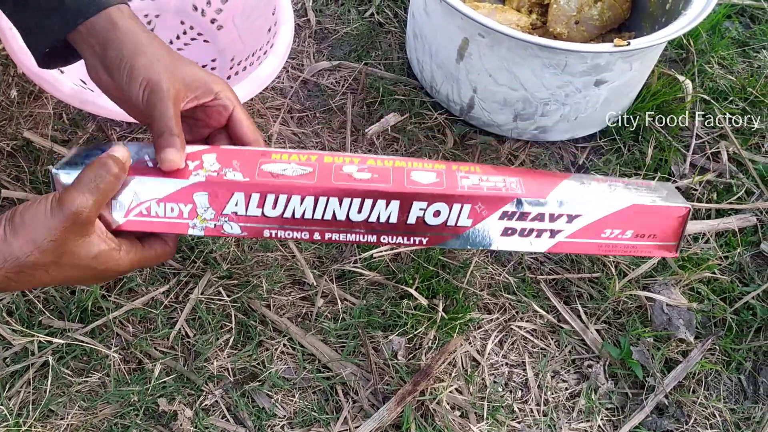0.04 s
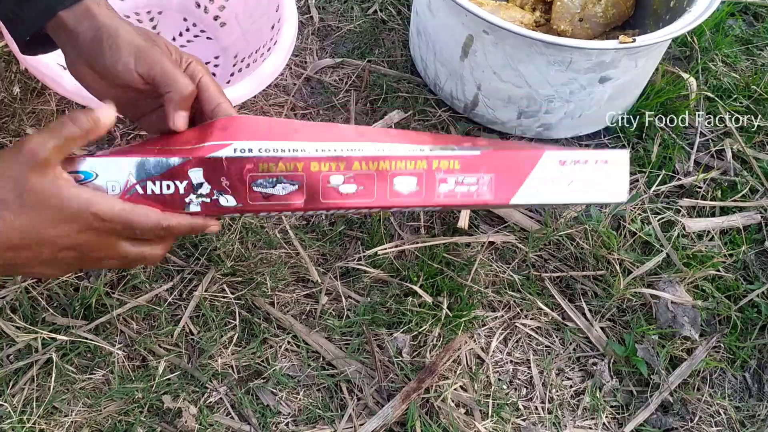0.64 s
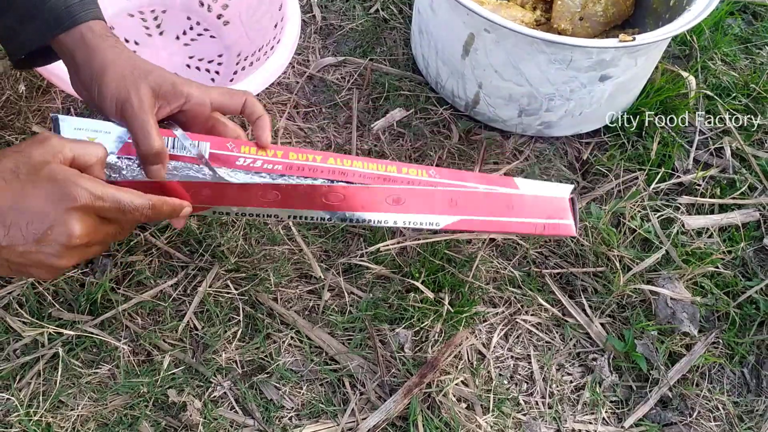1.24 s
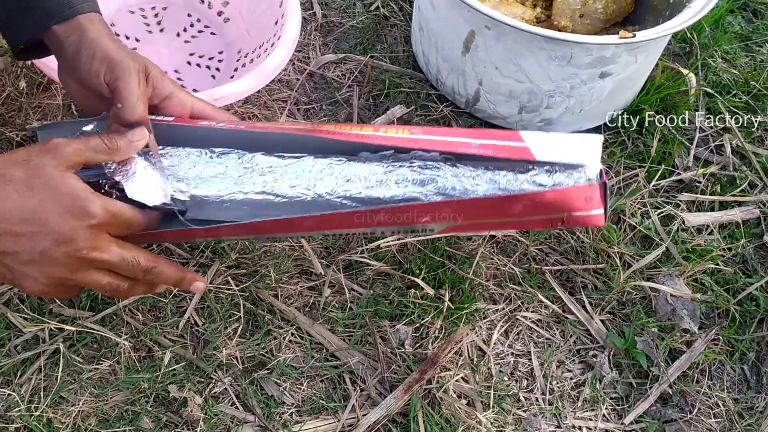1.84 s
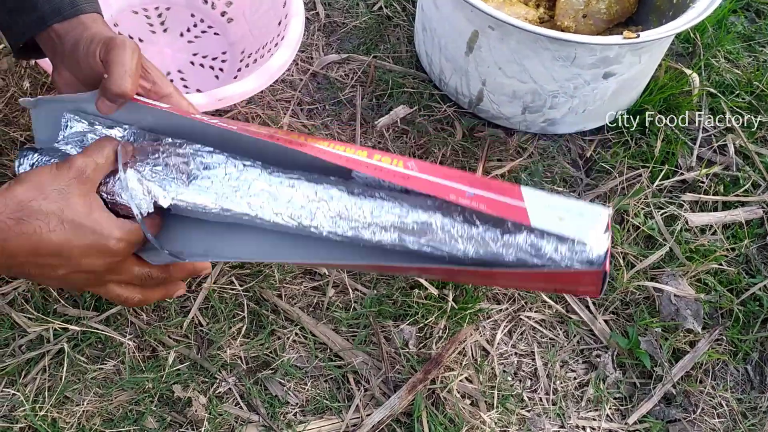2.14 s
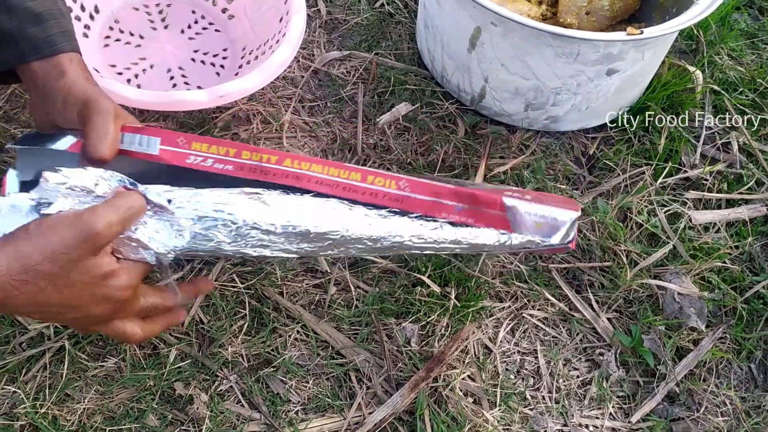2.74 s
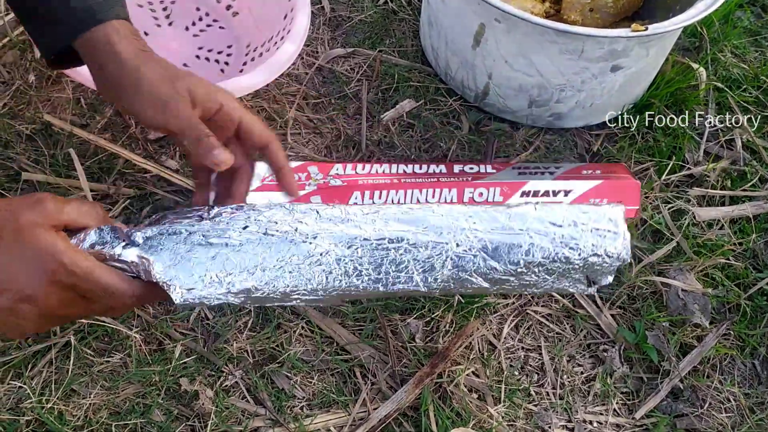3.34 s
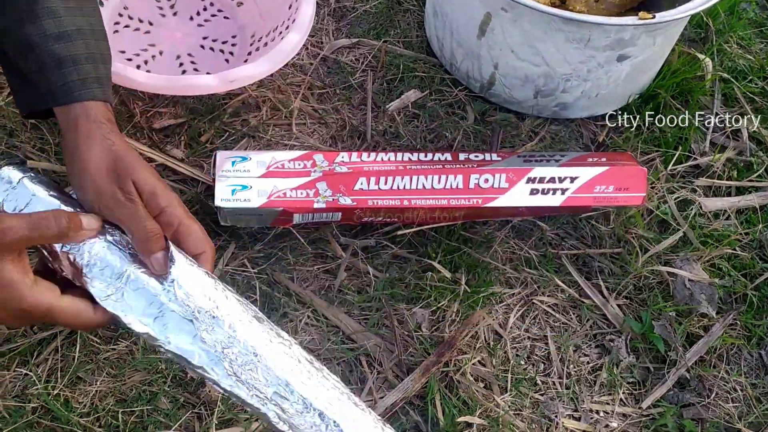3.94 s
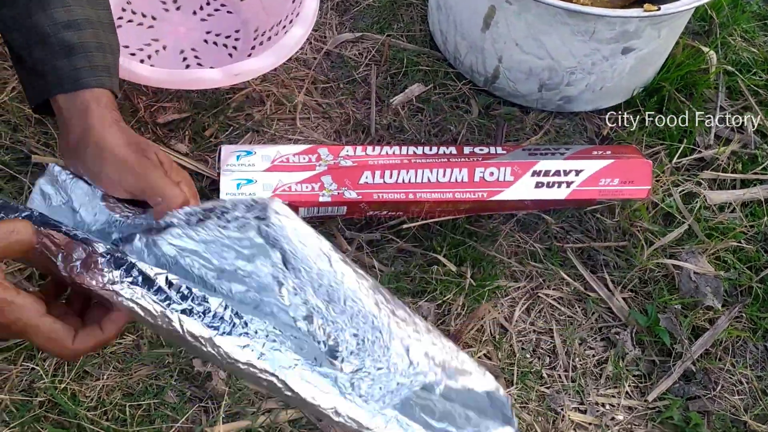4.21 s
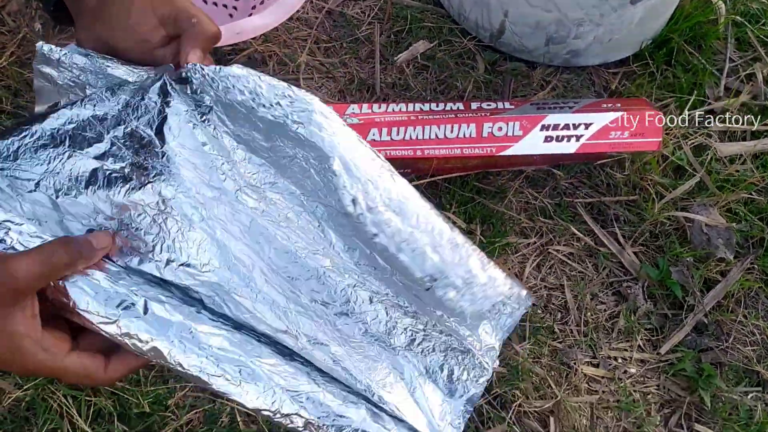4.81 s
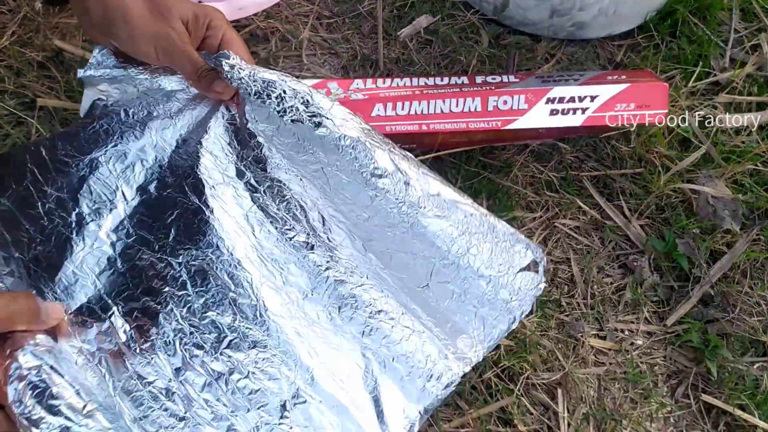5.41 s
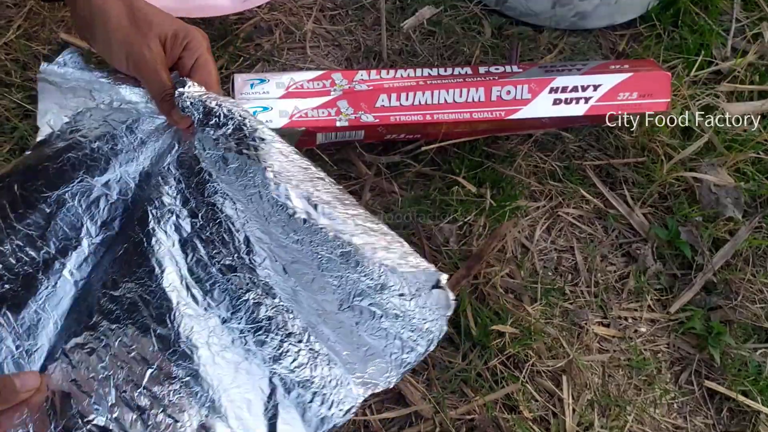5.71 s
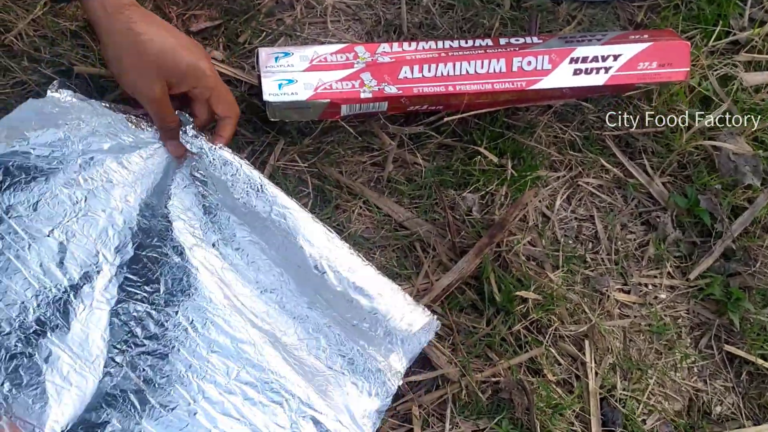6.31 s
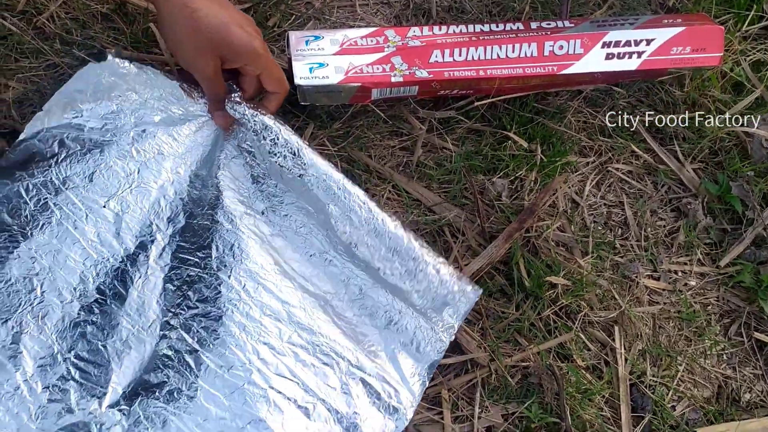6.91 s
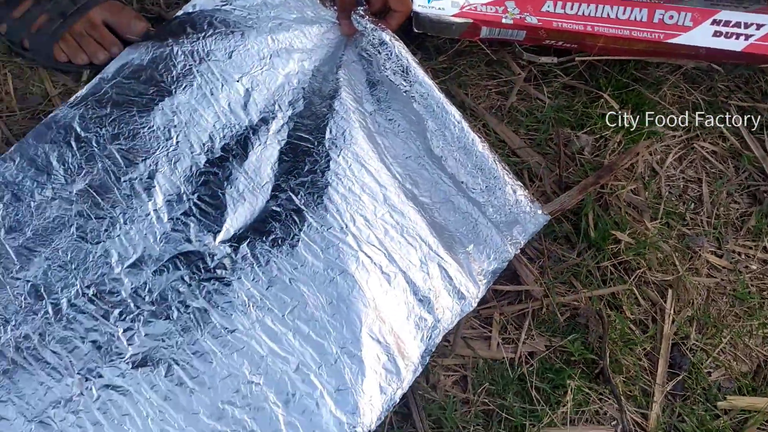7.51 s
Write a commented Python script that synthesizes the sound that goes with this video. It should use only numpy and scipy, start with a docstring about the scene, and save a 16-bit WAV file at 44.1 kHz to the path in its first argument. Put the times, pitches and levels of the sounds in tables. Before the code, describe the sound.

A cardboard box is handled near the microphone, tapping, rubbing and snapping as it opens. Foil crinkles inside, and the roll scrapes out with a short stutter. For the longer second part, a sheet of heavy aluminium foil is tugged open in uneven surges of metallic crackling and rustling. Behind it all lie a soft outdoor rumble and the steady low hum of a faraway engine.

```python
"""A cardboard box knocks and rubs as hands turn and open it; a roll of heavy aluminium foil is dragged
out, juddering on the wall, and the sheet is spread. The foil crackles as countless small creases buckle,
with a hollow rattle once its wide panels are free to flex. The box rings in its wall and cavity modes.
Outdoors, heard close by through two microphone ports; far off an engine hums."""
import sys
import numpy as np
from scipy import signal
from scipy.fft import rfft, irfft
from scipy.io import wavfile

SR = 44100
rng = np.random.default_rng(int(sys.argv[2]) if len(sys.argv) > 2 else 0)


def output_pcm(signal):
    """Save a mono or channel-first signal as 16-bit PCM at the path in sys.argv[1].

    Samples are clipped to [-1, 1] before scaling.
    """
    pcm = np.clip(np.atleast_2d(signal).T, -1, 1) * 32767
    wavfile.write(sys.argv[1], SR, np.round(pcm).astype(np.int16))


N = 332955
TIME = np.arange(N) / SR
FOIL_FREE_S = 3.0  # box let go, sheet free to flex
PORT_LAG_MS = 0.201  # left behind right

# opening of the sheet: t/s, share open (clipped to 0-1)
SHEET_OPENING = [(0, 0), (3.4, 0.08), (4.1, 0.06), (4.9, 0.04), (5.6, 0.45), (6.1, 1.03), (6.75, 1.1),
                 (7.2, 1), (7.55, 1.15)]
# spectrum of rolled foil: f/Hz, level/dB
ROLL_SPECTRUM = [(100, -21.5), (220, -14.5), (450, -12.5), (700, -8), (870, -13), (1080, -7), (1280, -14.5),
                 (1500, -6.5), (1900, -10.5), (2700, -8), (3200, -11), (4200, -6), (6000, -5.5), (8000, -4),
                 (11000, -7), (13500, -9), (16000, -13.5)]
# spectrum of the open sheet: f/Hz, level/dB
SHEET_SPECTRUM = [(100, -27), (250, -22), (720, -7), (900, -9), (1150, -5), (1350, -4), (1680, -5),
                  (1950, -6), (2600, -3.5), (3400, -1.5), (4300, -4), (5100, -6), (7500, -2.4),
                  (10500, -6.5), (13500, -8.5), (16000, -13)]
# treble shelf of the foil: t/s, gain/dB
FOIL_TREBLE = [(0, -11.5), (.8, -9.5), (1.05, 7), (1.3, -4), (2.2, -2), (2.45, -7.5), (2.6, -22),
               (2.75, -6), (3.5, 3), (4.5, 1), (5.4, 3), (6.1, 0.5), (6.75, 2.5), (7.15, 9), (7.45, 6.5)]


def foil(effort):
    """Buckling creases crackle in clumps over a fine fizz; the spectrum shifts as the sheet opens."""
    opened = np.clip(curve(SHEET_OPENING), 0, 1)
    density = 1 + 2 * opened
    crackle = unit(creases(per_s=500 * density) / np.sqrt(density))
    fizz = unit(ports(*rng.standard_normal((2, N)), PORT_LAG_MS))
    texture = amp(-4.5) * crackle + amp(-7) * tinkles() + amp(-3.5) * fizz
    worked = texture * effort * amp(1.1 * wander(8, 90))
    sheet = amp(-3) * colour(worked * (1 - opened), ROLL_SPECTRUM)
    sheet += amp(-0.5) * colour(worked * opened, SHEET_SPECTRUM)
    treble = signal.sosfiltfilt(signal.butter(1, 6000, "highpass", fs=SR, output="sos"), sheet)
    sheet += (amp(curve(FOIL_TREBLE)) - 1) * treble
    return sheet_echo(sheet) * lean_left(0.9)


# steady handling of the foil: t/s, level/dB
FOIL_GRIP = [(0, -38), (.42, -33.5), (.48, -43), (.75, -32.5), (1.05, -32.5), (1.45, -30.5), (1.86, -29.5),
             (2.15, -24), (2.58, -34), (2.76, -23.5), (3.15, -31), (3.25, -38), (3.38, -26.5),
             (3.88, -35.5), (4.0, -22.5), (4.5, -21.5), (5.9, -23.5), (6.85, -30.5)]
# tugs at the foil: t/s, rise/s, hold/s, level/dB
FOIL_TUGS = [(0.029, 0.0036, 0.0066, -29), (0.912, .006, 0.025, -24), (0.981, 0.056, 0.054, -24.5),
             (1.241, 0.0077, 0.017, -15.5), (1.48, 0.0066, 0.004, -10), (1.52, .003, .016, -25.5),
             (1.622, 0.024, 0.05, -14.5), (1.716, 0.018, 0.067, -21), (2.162, .01, 0.018, -16),
             (2.201, 0.015, 0.12, -12.5), (2.3, 0.073, 0.13, -8.5), (2.623, 0.011, 0.021, -23.5),
             (2.694, 0.011, 0.025, -21.5), (3.007, 0.016, 0.066, -21), (3.493, 0.064, 0.038, -19.5),
             (3.612, 0.054, 0.05, -23), (3.731, 0.022, 0.028, -21.5), (3.848, 0.0061, 0.0051, -19.5),
             (3.913, 0.059, 0.054, -19.5), (4.016, 0.034, 0.02, -14.5), (4.082, 0.068, 0.047, -15),
             (4.255, 0.021, 0.061, -19.5), (4.314, 0.055, 0.046, -19), (4.493, 0.061, 0.05, -21),
             (4.727, 0.02, 0.011, -40), (4.81, 0.017, 0.046, -33), (4.882, 0.026, .05, -23),
             (5.001, 0.015, 0.027, -21.5), (5.144, 0.1, 0.014, -18.5), (5.358, 0.03, 0.032, -19.5),
             (5.486, 0.024, 0.056, -22.5), (5.64, 0.014, 0.055, -21.5), (5.834, 0.09, 0.036, -18.5),
             (6.005, 0.029, 0.13, -23), (6.158, 0.041, 0.016, -22), (6.349, 0.016, 0.018, -24),
             (6.383, 0.078, 0.14, -20), (6.625, 0.044, 0.042, -22), (6.715, 0.038, 0.011, -21.5),
             (6.873, 0.031, 0.017, -19), (7.076, 0.038, 0.23, -25), (7.361, 0.074, 0.022, -13.5)]
# brief rests of the hands: t/s, gain/dB
HAND_RESTS = [(1.226, -1), (2.558, -9), (2.891, -2), (2.99, -3.5), (4.24, -2.5), (4.675, -4), (5.14, -3.5),
              (5.77, -1.5), (6.85, -0.5)]


def hand_effort(release_db_per_s=356, rest_s=0.024):
    """Tugs add their power to the steady handling; both ease when the hands rest."""
    tug_power = sum((amp(db) * stroke(s, rise, hold, release_db_per_s)) ** 2
                    for s, rise, hold, db in FOIL_TUGS)
    rest_db = sum(db * np.exp(-((TIME - s) / rest_s) ** 2) for s, db in HAND_RESTS)
    return np.sqrt(amp(curve(FOIL_GRIP)) ** 2 + tug_power) * amp(rest_db)


def creases(per_s, facets=28):
    """Creases buckle in facets of the sheet; each has its own pitch and place, and they take turns."""
    out = np.zeros((2, N))
    for hz in np.geomspace(2900, 13000, facets):
        lag_ms = rng.uniform(0.04, 0.392)
        tick = burst(0.002, 0.00003, lag_ms) + burst(0.03, 0.008, lag_ms)  # onset + tail
        tick = unit(tick + amp(10) * ring(tick, hz, hz / 7))
        train = clicks(per_s / facets, spread_db=4.2) * amp(3.5 * np.tanh(wander(6.9, 40)))
        out += convolve(train[None], tick)
    return unit(out)


def tinkles(per_s=560, facets=64, t60_cycles=45):
    """Small stiff facets ring on after their crease gives, each on its own metallic note."""
    out = np.zeros((2, N))
    for hz in np.linspace(2600, 13000, facets):
        t = port_time(2048, rng.uniform(0, 1.935) * PORT_LAG_MS)
        note = unit(amp(-60 * t * hz / t60_cycles) * np.sin(2 * np.pi * hz * t))
        train = clicks(per_s / facets, spread_db=2.8)
        for at in np.flatnonzero(train):
            add(out, at / SR, train[at] * note)
    return unit(out)


def sheet_echo(x, gain=0.28, delay_ms=0.452, sway=0.29):
    """An echo off the moving sheet: its changing delay sweeps a metallic comb through the sound."""
    at = np.arange(N)
    delay_samples = delay_ms * SR / 1000 * np.exp(sway * wander(1, 7.4))
    echo = np.array([np.interp(at - delay_samples, at, side) for side in x])
    return (x + gain * echo) / np.sqrt(1 + gain ** 2)


# snaps of the box lid and of large foil creases: t/s, level/dB, shake re tick/dB, f/Hz
SHARP_SNAPS = [(.891, -1, -22, 4600), (.906, .5, -22, 4800), (1.168, -13, 8, 7600), (1.239, -4.5, 3, 6000),
               (1.270, -.5, -7, 5000), (1.413, -16, 2, 6000), (1.541, -6, -2, 5030),
               (1.570, -1.5, -10, 6000), (1.604, -2.5, -2, 4300), (1.644, 5, -4, 7700),
               (1.659, -0.5, 1, 8000), (1.897, -13, 4, 6000), (1.957, -6, 0, 5500), (1.991, -12, 9, 6500),
               (2.060, -9, 3, 5000), (2.1, -1.5, -4, 6000), (2.173, -9.5, 8, 6000), (2.186, 0, -2, 4800),
               (2.217, -4, 1, 5500), (2.238, -2, 1, 6900), (2.286, 2, 2, 7600), (2.359, 0, -2, 4800),
               (2.369, -3, -2, 4100), (2.395, 4.5, -4, 4000), (2.413, -2, 0, 4100), (2.472, 1, -1, 3100),
               (2.603, -12, -1, 3600), (2.714, -13, 4, 6900), (2.823, -16, 4, 6900), (2.908, -16, 4, 6200),
               (3.144, -12, -1, 8300), (3.206, -12, -6, 7000), (3.29, -14, -2, 7000), (3.316, -16, 2, 5500),
               (3.356, -14, 1, 7600), (3.38, -10, 0, 6900), (3.56, -5, 2, 6900), (3.607, -1, -5, 7600),
               (3.692, -8, 3, 7600), (3.801, -4, 2, 6900), (3.830, -0.5, -6, 8500), (3.855, -11, 1, 6200),
               (3.876, -7, 1, 4800), (4.052, 0, 2, 6000), (4.117, -2, -3, 5500), (4.15, -1, 4, 6900),
               (4.18, 3, -8, 8500), (4.195, 1, -6, 6000), (4.285, -4, 3, 6900), (4.319, 0, -9, 8000),
               (4.373, -1, 0, 4800), (4.387, 2, -1, 6900), (4.42, -3, 2, 8300), (4.592, -3, 2, 8300),
               (4.624, -3, 0, 9000), (4.695, -10, 1, 6200), (4.751, 0, -9, 6200), (4.765, -4, -1, 6200),
               (4.828, -8, 0, 4800), (4.959, -5, -1, 7600), (5.104, -2, -2, 7600), (5.252, -2, 4, 6900),
               (5.409, -4, 2, 7600), (5.640, 3, -2, 6000), (5.867, -7, 3, 8700), (6.067, 1, -2, 6500),
               (6.106, -1, -2, 3900), (6.141, 4.5, -3, 6000), (6.312, -4, -4, 6200),
               (6.330, 4.5, -11, 11500), (7.400, 3, -4, 7000)]


def snaps():
    """The box lid or a large foil crease snaps: one sharp, pitched tick and a short shake."""
    out = np.zeros((2, N))
    for s, db, shake_db, hz in SHARP_SNAPS:
        tick = burst(0.009, 0.00003, 0.224)
        tick = 0.42 * tick + 1.4 * ring(tick, hz, hz / 4.5)
        shake = amp(shake_db) * burst(0.03, 0.0028, 0.2)
        add(out, s, amp(db + 8.5) * (tick + shake))
    return colour(out, ROLL_SPECTRUM) * lean_left(0.8)


# folds crushed in one go, and at 2.503 s a rasp of the roll catching on the wall: t/s, hold/s, level/dB, f/Hz
FOLD_CRUNCHES = [(1.617, .004, -26, 4320), (2.63, 0.031, -35, 4760), (2.631, .012, -30, 3030),
                 (2.503, .005, -12, 3030), (5.91, 0.03, -30, 3580), (6.063, .004, -23, 3400),
                 (6.496, 0.019, -24, 3060), (6.716, 0.023, -24, 3580), (6.748, 0.0088, -18.5, 3470),
                 (6.89, 0.018, -23.5, 3240), (7.412, 0.024, -19.5, 3170)]


def crunches(rise_s=0.0019, release_db_per_s=600, q=2.2):
    """A fold gives way, or the roll rasps on the wall: a dense run of small clicks rings a narrow band beside
    it."""
    drive = ports(clicks(4000, 1.7), clicks(4000, 4.2), lag_ms=0.19)
    out = np.zeros((2, N))
    for s, hold, db, hz in FOLD_CRUNCHES:
        note = unit(steep_ring(drive, hz, hz / q))
        out += amp(db) * stroke(s, rise_s, hold, release_db_per_s) * note
    return out * lean_left(0.9)


# spectrum of wide foil panels: f/Hz, level/dB
PANEL_SPECTRUM = [(90, 6.5), (170, -1.5), (300, -4.5), (500, -0.5), (690, 7), (870, -1.5), (1080, 8.5),
                  (1280, 5.5), (1650, -1.5), (2100, 5), (2750, 2), (6000, -22)]
# panels bending: t/s, hold/s, level/dB
PANEL_BENDS = [(2.623, 0.041, -33), (3.668, 0.03, -31.5), (3.779, 0.018, -32), (3.871, 0.0057, -31),
               (4.031, 0.013, -27.5), (4.102, 0.082, -27.5), (4.383, 0.03, -25.5), (5.016, 0.018, -28.5),
               (5.259, 0.014, -32), (5.411, 0.0088, -27), (5.631, 0.0078, -26.5), (5.774, 0.0094, -31),
               (5.84, 0.035, -34), (6.05, 0.096, -32.5), (6.48, 0.16, -37), (6.76, .015, -34),
               (6.889, 0.043, -32.5)]


def flexing(effort, panels=6, rise_s=0.0037, release_db_per_s=456):
    """Wide foil panels rattle hollowly at each bend and, once free of the box, with every move."""
    rattle = sum(convolve(clicks(120, 5.6)[None], burst(0.024, 0.00007, 0.25)) for _ in range(panels))
    bends = sum(amp(db) * stroke(s, rise_s, hold, release_db_per_s) for s, hold, db in PANEL_BENDS)
    flex = amp(-26) * effort * (TIME > FOIL_FREE_S)
    return amp(2) * np.hypot(bends, flex) * unit(colour(rattle, PANEL_SPECTRUM))


# pops and knocks of card or foil, ring of a hollow rub: t/s, level/dB, f/Hz, t60/s
HOLLOW_TONES = [(.056, -13.5, 200, 0.081), (1.3345, 7.5, 370, 0.01), (1.495, -2, 636, 0.022),
                (1.898, -5.5, 340, 0.049), (2.633, -19.5, 598, 0.23), (2.66, -20, 373, 0.13),
                (5.09, -36, 695, 0.018), (6.603, -11.5, 716, 0.037)]


def hollow_tones(rise_s=0.00049):
    """Card or foil pops, knocks or rings from a hollow rub, each in one short, decaying tone."""
    out, t = np.zeros((2, N)), np.arange(4096) / SR
    for s, db, hz, t60 in HOLLOW_TONES:
        tone = amp(db - 8.5 - 60 * t / t60) * (1 - np.exp(-t / rise_s)) * np.sin(2 * np.pi * hz * t)
        add(out, s, np.array([tone, tone]))
    return out


# box knocks, creaks, flap snaps: t/s, crack/dB, clack/dB, thud/dB, rattle t60/s, strike f/Hz
BOX_KNOCKS = [(0.018, -28, -24, -33, 0.088, 1000), (0.055, -15.5, -15, -19, 0.055, 900),
              (.062, -31, -18.5, -34, .035, 1000), (.123, -23.5, -31, -54, 0.039, 2000),
              (0.345, -12, -11.5, -21, 0.06, 1400), (.393, -22, -15, -44, 0.07, 1200),
              (.401, -28, -19, -44, 0.044, 1000), (.51, -29, -22.5, -41, 0.064, 1400),
              (0.5641, -17, -11, -23, 0.021, 1640), (0.5658, -16, -5, -31.5, 0.016, 2420),
              (0.657, -24, -28, -42, 0.077, 1500), (0.824, -29, -22, -23, 0.031, 950),
              (0.847, -40, -17, -25, 0.048, 800), (.872, -40, -21, -26, .03, 850),
              (0.892, -36, -12.5, -30, 0.018, 1000), (.905, -32, -11.5, -39, 0.034, 1100),
              (0.916, -13, -8.5, -29, 0.04, 1200), (.986, -40, -21, -30, .03, 850),
              (1.036, -36, -15, -24, 0.034, 900), (1.120, -7.5, -11, -36, 0.038, 2500),
              (1.342, -0.5, -13, -39, 0.039, 6000), (1.364, -24, -15, -41, 0.022, 1500),
              (1.49, -2.5, -3, -37, 0.04, 2800), (1.496, -9, -7, -36, 0.014, 1400),
              (1.898, -31, -12.5, -17.5, 0.023, 744), (2.513, -11, -5, -20, 0.013, 2600),
              (2.533, -14, -9, -32, 0.014, 2000), (2.553, -20, -16, -48, 0.017, 3000),
              (2.602, -35, -17.5, -42, 0.04, 2200), (2.634, -27, -32, -38, 0.2, 1300)]
# spectrum of the edge's crack: f/Hz, level/dB
CRACK_SPECTRUM = [(100, -40), (500, -26), (1500, -11), (2600, -5), (3300, -8), (4600, 1), (6000, 0),
                  (7500, -5), (11000, -8), (16000, -21)]
# spectrum of the clack's rattle: f/Hz, level/dB
RATTLE_SPECTRUM = [(150, -26), (450, -10), (700, -4), (1000, 1), (1400, -1), (1800, -4), (2300, -1),
                   (3300, -13), (9000, -38)]
# modes of the hollow box: f/Hz, level/dB, t60/s
CAVITY_MODES = [(176, -3, 0.057), (260, 3.5, 0.068), (370, -6.5, 0.11), (543, -1.5, 0.055)]


def knocks():
    """Each knock is a crack of the edge, a clack that rattles and rings the wall, and a hollow thud."""
    crack, rattle, modes = np.zeros((3, 2, N))
    t = np.arange(4096) / SR
    thud = sum((-1) ** k * amp(db - 60 * t / t60) * np.sin(2 * np.pi * hz * t)
               for k, (hz, db, t60) in enumerate(CAVITY_MODES))
    thud /= np.linalg.norm(thud)
    for s, crack_db, clack_db, thud_db, t60, strike_hz in BOX_KNOCKS:
        add(crack, s, amp(crack_db + 16) * burst(0.21 * t60, 0.0026, 0.22))
        add(rattle, s, amp(clack_db + 10.5) * burst(t60, 0.0004, 0.13))
        add(modes, s, amp(clack_db + 15) * wall_ring(strike_hz) + amp(thud_db + 18) * thud)
    return colour(crack, CRACK_SPECTRUM) * lean_left(0.8) + colour(rattle, RATTLE_SPECTRUM) + modes


# modes of the cardboard wall: f/Hz, level/dB, t60/s
WALL_MODES = [(600, -7, .026), (940, -4, .034), (995, -2, .034), (1114, -5, .026), (1410, -3, .026),
              (1560, -7, .02), (2080, -3, .014), (2310, 3, .018), (2620, -3, .014), (3600, -10, .014),
              (4480, -5, .013), (4870, -4, .015), (5800, -6, .011)]


def wall_ring(strike_hz, rise_s=0.00072, size=4096):
    """A blow rings the wall, most within an octave of strike_hz; the pitch shifts with the grip."""
    t = port_time(size, PORT_LAG_MS)
    detune = 1 + rng.uniform(-0.063, 0.05)
    out = np.zeros((2, size))
    for hz, db, t60 in WALL_MODES:
        weight = np.exp(-0.5 * np.log2(hz / strike_hz) ** 2)
        out += weight * amp(db - 60 * t / t60) * np.sin(2 * np.pi * (hz * detune * t + rng.random()))
    return unit(out * (1 - np.exp(-t / rise_s))) / np.sqrt(size)


# fingers, lid and roll sliding on cardboard: t/s, rise/s, hold/s, scuff/dB, ring/dB
BOX_SLIDES = [(0, 0.0041, 0.017, -30.5, -47), (0.233, 0.036, 0.15, -43.5, -71.5),
              (0.755, 0.053, 0.14, -39, -49), (0.834, 0.0054, 0.0078, -30, -37),
              (0.865, .005, 0.063, -32, -36.5), (0.942, 0.004, 0.0078, -31, -49),
              (0.983, 0.0046, 0.0045, -30.5, -36), (1.02, 0.0094, 0.019, -28.5, -42),
              (1.067, 0.026, 0.017, -27, -37), (1.225, 0.031, 0.016, -33.5, -38),
              (1.331, 0.012, 0.008, -22.5, -56), (1.466, 0.025, 0.0077, -23.5, -35),
              (1.612, 0.027, 0.052, -26.5, -41), (1.694, 0.034, 0.11, -39, -54),
              (2.121, .02, 0.03, -51, -42), (2.216, 0.013, 0.0083, -24.5, -49),
              (2.274, 0.018, 0.019, -21, -32), (2.355, .02, 0.13, -34.5, -35),
              (2.46, 0.026, 0.057, -24.5, -33), (2.63, 0.0043, 0.053, -31, -55),
              (2.717, 0.017, 0.067, -40, -37)]
# box ringing as the roll drags along its wall: t/s, level/dB
ROLL_DRAG = [(2.15, -72), (2.29, -35), (2.37, -16.5), (2.45, -22), (2.486, -17), (2.508, -17), (2.536, -27),
             (2.546, -33), (2.62, -55)]
# spectrum of scuffed cardboard: f/Hz, level/dB
SCUFF_SPECTRUM = [(80, -39), (140, 3.5), (250, 4), (370, 8), (520, 2), (720, -0.5), (1000, 9.5), (1250, -6),
                  (1500, 8), (1850, -16.5), (2400, 2), (3500, -9), (8000, -49)]
# resonances of the rubbed box: f/Hz, width/Hz, level/dB
BOX_RESONANCES = [(650, 280, -16.5), (940, 50, -1.5), (988, 55, 1.5), (1070, 100, -7), (1460, 240, -15),
                  (2350, 300, -23), (2950, 400, -17), (3640, 350, -19), (4400, 700, -20), (5500, 900, -24)]


def rubbing(release_db_per_s=400):
    """Stick and slip scuffs the cardboard and makes the box itself ring."""
    slips = unit(ports(clicks(4000, 2), clicks(4000, 2), lag_ms=0.17))
    scuff = colour(slips, SCUFF_SPECTRUM)
    ringing = unit(sum(amp(db) * steep_ring(slips, hz, width) for hz, width, db in BOX_RESONANCES))
    stutter = amp(2 * wander(7.8, 80))
    scuff_gain, ring_gain = amp(-47), amp(-67)  # faint contact of the holding hand
    ring_gain = np.hypot(ring_gain, amp(curve(ROLL_DRAG)))
    for s, rise, hold, scuff_db, ring_db in BOX_SLIDES:
        slide = stroke(s, rise, hold, release_db_per_s)
        scuff_gain = np.hypot(scuff_gain, amp(scuff_db) * slide)
        ring_gain = np.hypot(ring_gain, amp(ring_db) * slide)
    in_hand = stroke(0, 0.001, FOIL_FREE_S, release_db_per_s)
    return in_hand * stutter * (amp(-1.5) * scuff_gain * scuff + amp(1.5) * ring_gain * ringing)


# roll catching on the wall: t/s, rise/s, hold/s, level/dB
ROLL_JUDDERS = [(2.367, .003, .008, -20), (2.446, .003, .01, -23), (2.474, .002, .005, -19),
                (2.489, .005, .009, -10), (2.513, .002, .003, -14), (2.532, .002, .003, -12.5)]


def judders(wall_hz=985, waver=0.018, third_harmonic_db=-13, release_db_per_s=1502):
    """The dragged roll sticks and slips in step with the main mode of the wall."""
    level = sum(amp(db) * stroke(s, rise, hold, release_db_per_s) for s, rise, hold, db in ROLL_JUDDERS)
    cycles = np.cumsum(wall_hz * (1 + waver * wander(14, 160))) / SR
    phase = 2 * np.pi * (cycles - wall_hz * np.array([[PORT_LAG_MS / 1000], [0]]))
    return level * np.sqrt(2) * (np.sin(phase) + amp(third_harmonic_db) * np.sin(3 * phase))


def scatter(x, paths=6):
    """Short reflections off the ground and moving sheet take turns; long waves pass them by."""
    treble = signal.sosfilt(signal.butter(2, 1800, "highpass", fs=SR, output="sos"), x)
    weights = np.array([wander(1.5, 9) for _ in range(paths)])
    weights /= np.linalg.norm(weights, axis=0)
    return sum(convolve(treble * weight, burst(0.062, 0.0022, 0.033)) for weight in weights)


# engine tones: f/Hz, level/dB
ENGINE_TONES = [(43.6, -45), (64.6, -32.5), (75.4, -31.5), (86, -44.5), (114, -74), (130, -65)]


def engine(drift=0.012, swell_db=1.6):
    """Low tones of a distant engine drift and beat against each other."""
    out = np.zeros(N)
    for hz, db in ENGINE_TONES:
        cycles = np.cumsum(hz * (1 + drift * wander(0.1, 2.1))) / SR
        rms = amp(db - 5.5 + swell_db * wander(2, 8))
        out += rms * np.sqrt(2) * np.sin(2 * np.pi * (cycles + rng.random()))
    return out


# spectrum of the outdoor air: f/Hz, level/dB
AIR_SPECTRUM = [(15, -55), (30, 2), (40, -3), (55, 4.5), (85, -4), (105, -3.5), (160, -15), (300, -19.5),
                (600, -21.5), (760, -13), (1400, -18.5), (4000, -37), (10000, -36), (16000, -36)]


def air(rms_db=-38.5):
    """Outdoor rumble and faint hiss."""
    noise = ports(*rng.standard_normal((2, N)), lag_ms=0.32)
    return amp(rms_db) * unit(colour(noise, AIR_SPECTRUM))


# likeness of the two ports: f/Hz, coherence (0-1)
PORT_COHERENCE = [(100, 0.98), (500, 1), (1000, 1), (2000, 0.07), (5000, 0.89), (16000, 0)]


def ports(right, other, lag_ms):
    """The left port hears the right one's sound later, blended with another, mostly in the treble."""
    hz = np.fft.rfftfreq(len(right), 1 / SR)
    shared = np.clip(at_hz(PORT_COHERENCE, hz), 0, 1)
    left = shared * rfft(right) + np.sqrt(1 - shared ** 2) * rfft(other)
    delay = np.exp(-2j * np.pi * hz * lag_ms / 1000)
    return np.array([irfft(left * delay, len(right)), right])


def port_time(size, lag_ms):
    """Seconds since a sound reached each port, the left one late."""
    return np.maximum(np.arange(size) / SR - np.array([[lag_ms / 1000], [0]]), 0)


def lean_left(db):
    """Stereo gains: left up, right down by db."""
    return amp([[db], [-db]])


def burst(t60_s, rise_s, lag_ms, size=4096):
    """Many close modes struck at once and dying quickly: stereo, unit energy."""
    t = np.arange(size) / SR
    noise = rng.standard_normal((2, size)) * amp(-60 * t / t60_s) * (1 - np.exp(-t / rise_s))
    return unit(ports(*noise, lag_ms)) / np.sqrt(size)


def clicks(per_s, spread_db):
    """Random clicks, mostly small and a few large."""
    hit = rng.random(N) < per_s / SR
    size = amp(spread_db * np.minimum(rng.exponential(1, N), 3))
    return hit * size * rng.choice([-1., 1.], N)


def stroke(start_s, rise_s, hold_s, release_db_per_s):
    """Envelope of one hand move: rise, hold, decay."""
    t = TIME - start_s
    return np.clip(t / rise_s, 0, 1) * amp(-np.clip(release_db_per_s * (t - rise_s - hold_s), 0, 100))


def wander(slow_hz, fast_hz):
    """Random drift between two rates, roughly pink, rms 1."""
    hz = np.fft.rfftfreq(N, 1 / SR)
    band = (hz > slow_hz) * (hz < fast_hz) / np.sqrt(hz + slow_hz)
    return unit(irfft(rfft(rng.standard_normal(N)) * band, N))


def ring(x, hz, width_hz):
    """A resonance of peak gain 1."""
    return signal.lfilter(*signal.iirpeak(hz, hz / width_hz, SR), x)


def steep_ring(x, hz, width_hz):
    """A resonance applied twice for steep skirts."""
    return ring(ring(x, hz, width_hz), hz, width_hz)


def colour(x, spectrum, size=2048):
    """Minimum-phase filter of unit energy with the given spectrum."""
    log_gain = np.log(amp(at_hz(spectrum, abs(np.fft.fftfreq(size, 1 / SR)))))
    taps = np.fft.ifft(np.exp(np.conj(signal.hilbert(log_gain)))).real
    return convolve(x, taps[None] / np.linalg.norm(taps))


def convolve(x, response):
    """Convolution in time, cut to the scene's length."""
    return signal.oaconvolve(x, response, axes=1)[:, :N]


def add(mix, start_s, sound):
    """Lays a stereo sound into the mix."""
    part = mix[:, round(start_s * SR):][:, :sound.shape[1]]
    part += sound[:, :part.shape[1]]


def curve(rows):
    """A table interpolated over time."""
    return np.interp(TIME, *np.transpose(rows))


def at_hz(rows, hz):
    """A table interpolated over log frequency."""
    row_hz, value = np.transpose(rows)
    return np.interp(np.log(hz + 1), np.log(row_hz + 1), value)


def amp(db):
    """Decibels to gain."""
    return 10 ** (np.asarray(db) / 20)


def unit(x):
    """Scales to rms 1."""
    return x / np.sqrt(np.mean(x ** 2) + 1e-20)


def scene():
    """Foil and box close by, engine and air behind."""
    effort = hand_effort()
    near = foil(effort) + flexing(effort) + snaps() + crunches()
    near += rubbing() + judders() + knocks() + hollow_tones()
    return near + amp(-4) * scatter(near) + engine() + air()


def record(dry, cutoff_hz=15900):
    """The loudest peaks clip; a steep low-pass follows."""
    lowpass = signal.firwin(511, cutoff_hz, window=("kaiser", 9), fs=SR)
    return signal.oaconvolve(np.clip(dry, -1, 1), lowpass[None], "same")


dry = scene()
out = record(dry)
output_pcm(out)
```